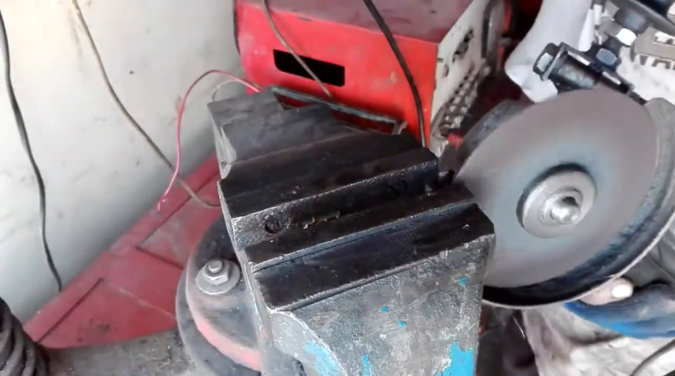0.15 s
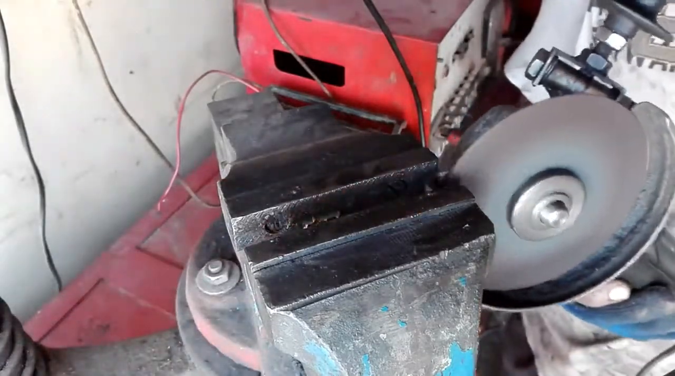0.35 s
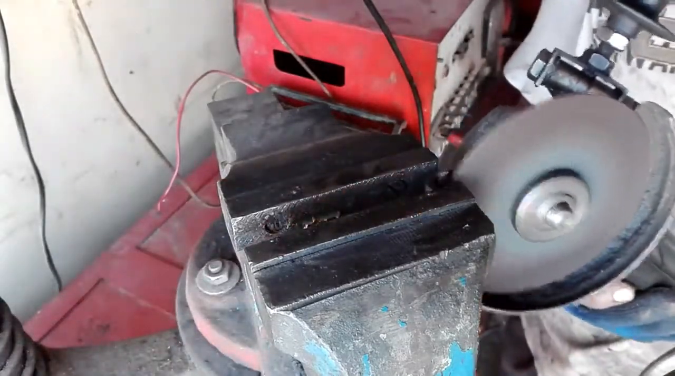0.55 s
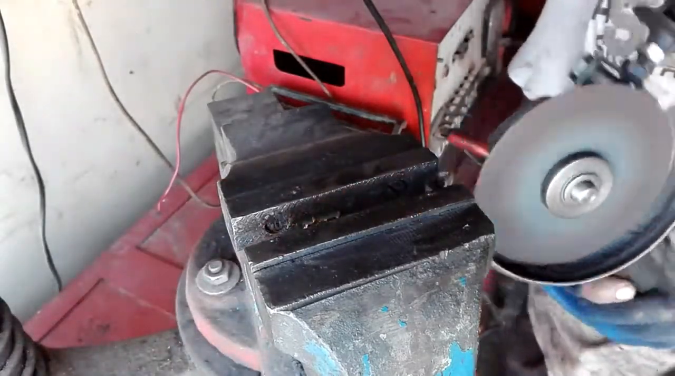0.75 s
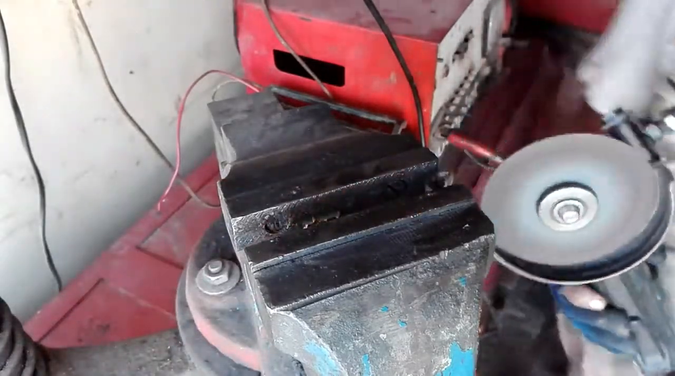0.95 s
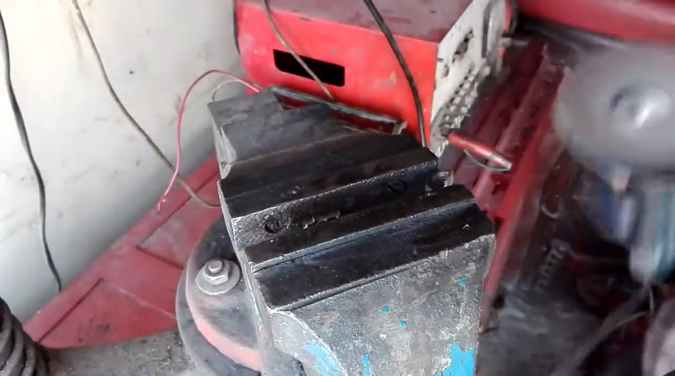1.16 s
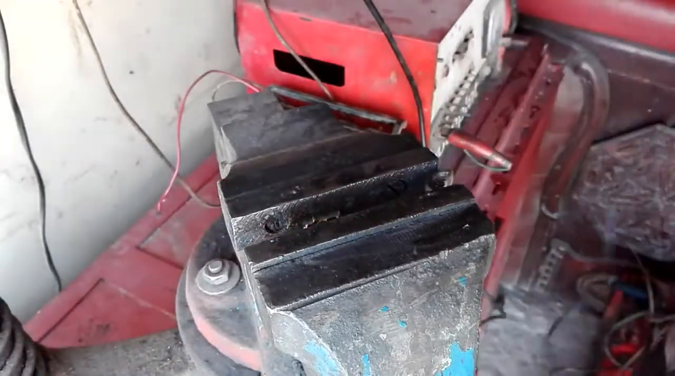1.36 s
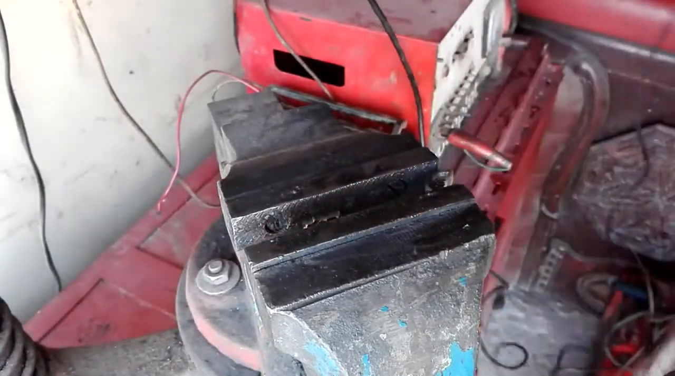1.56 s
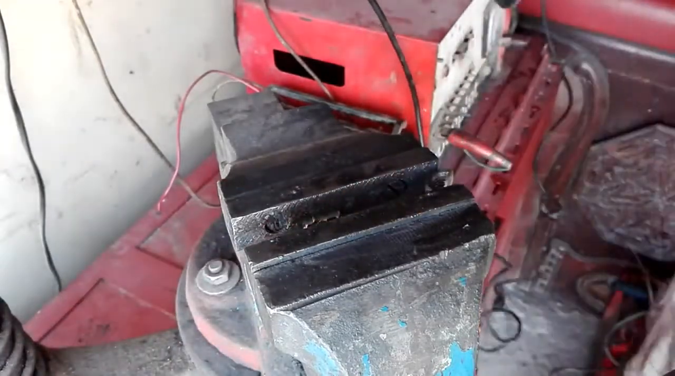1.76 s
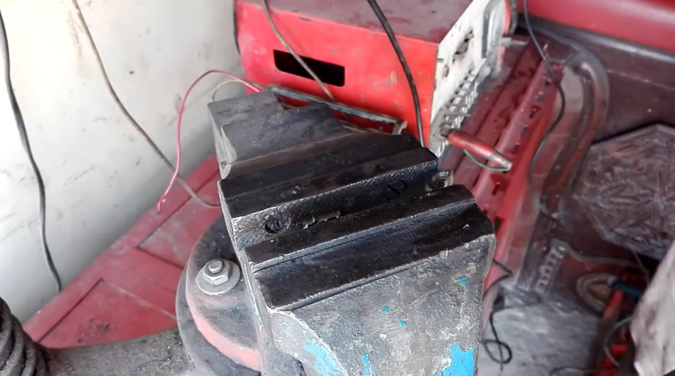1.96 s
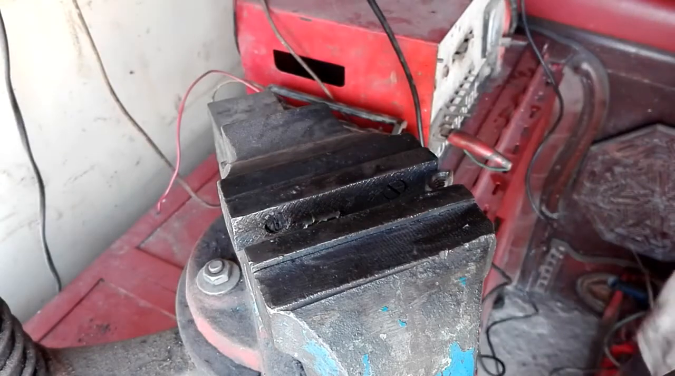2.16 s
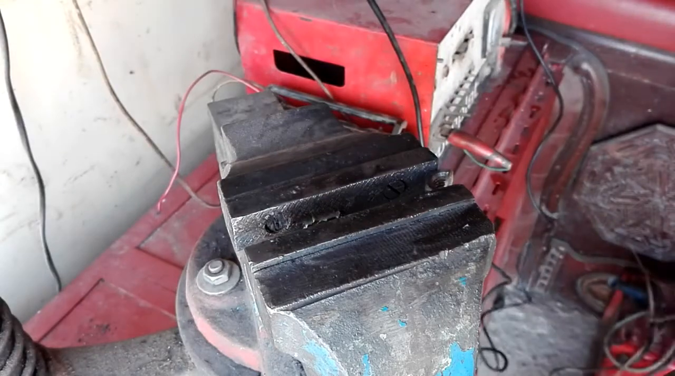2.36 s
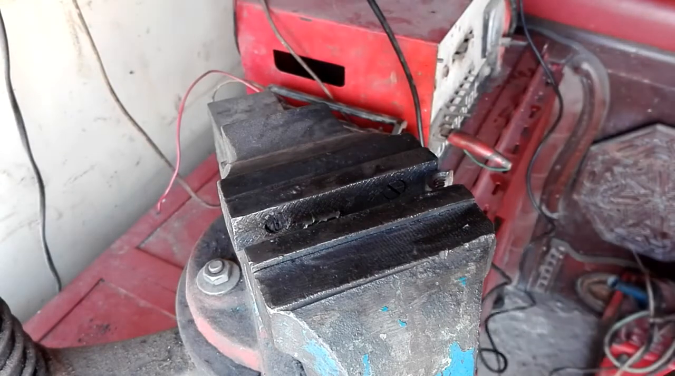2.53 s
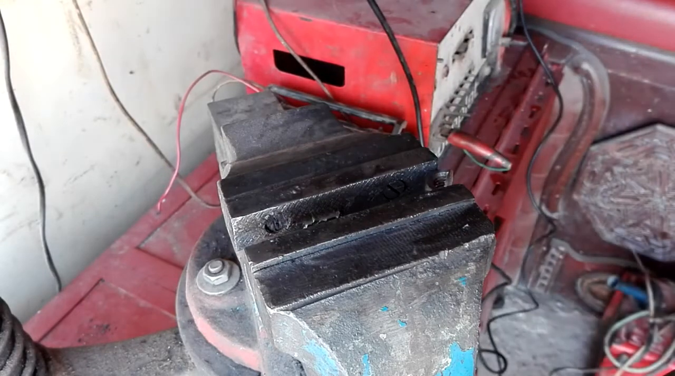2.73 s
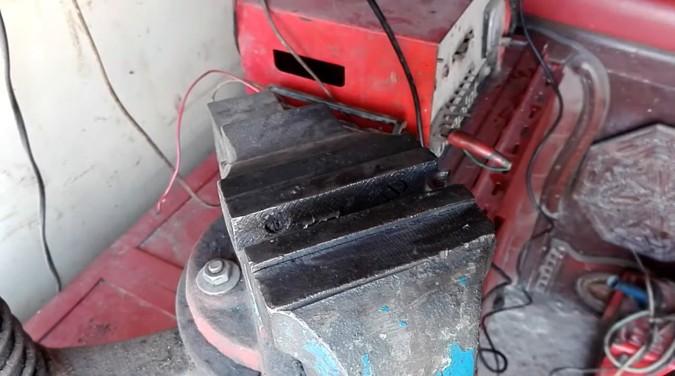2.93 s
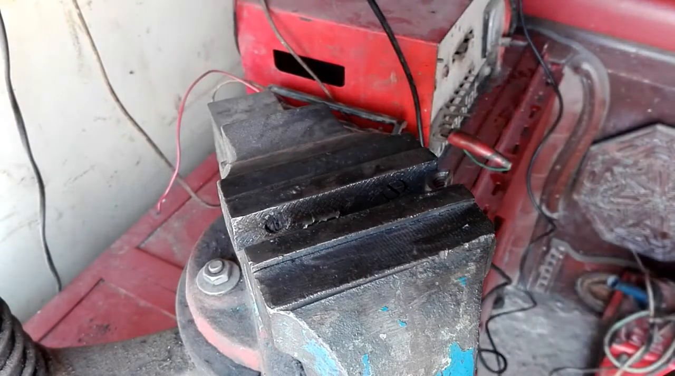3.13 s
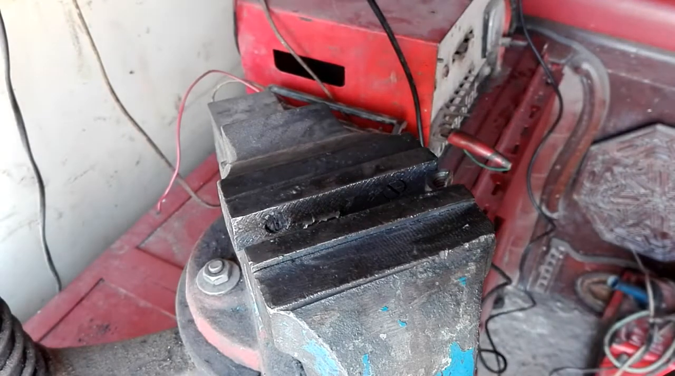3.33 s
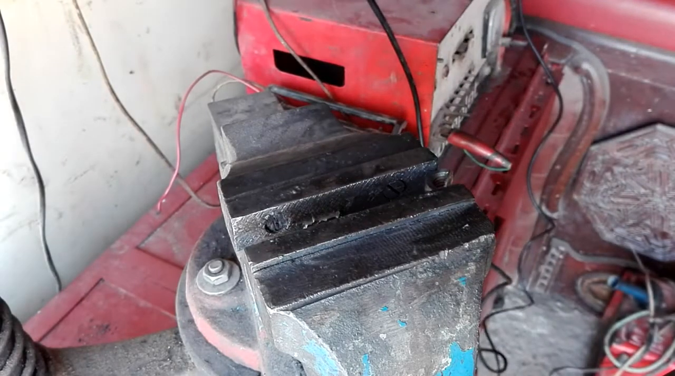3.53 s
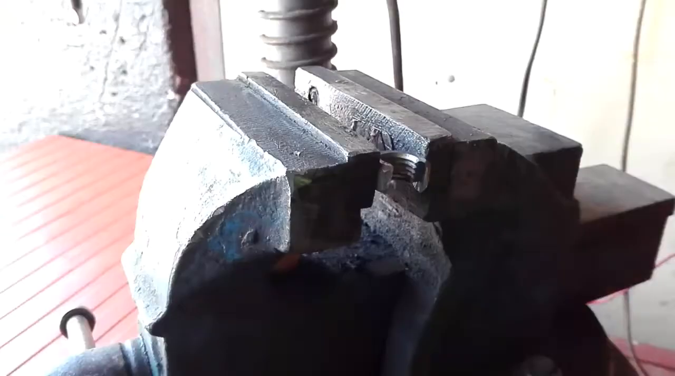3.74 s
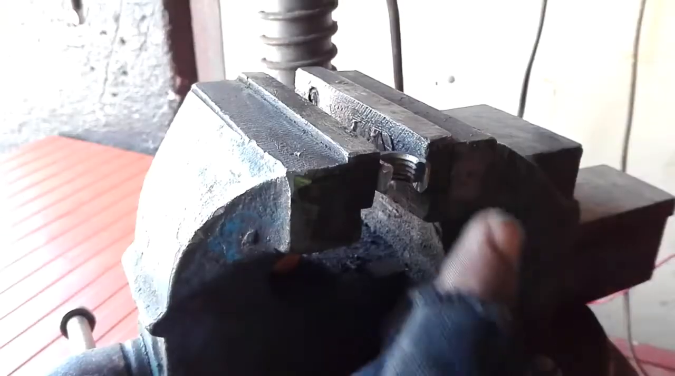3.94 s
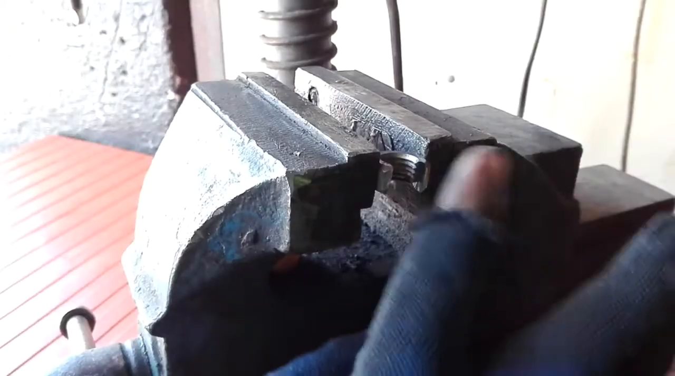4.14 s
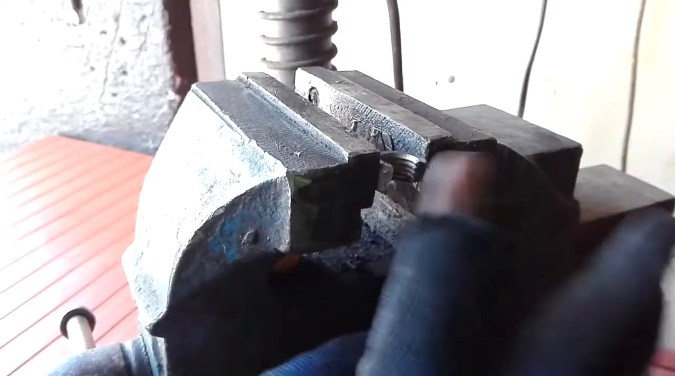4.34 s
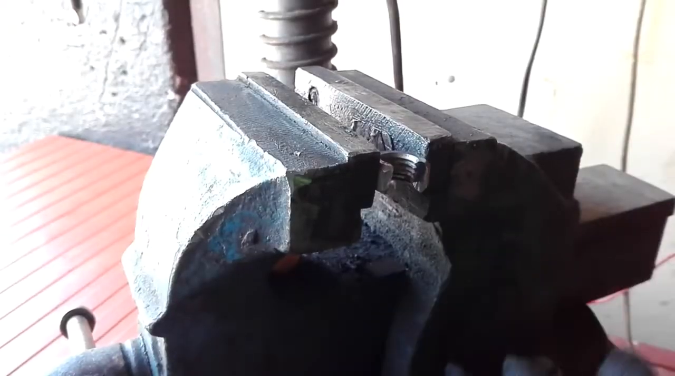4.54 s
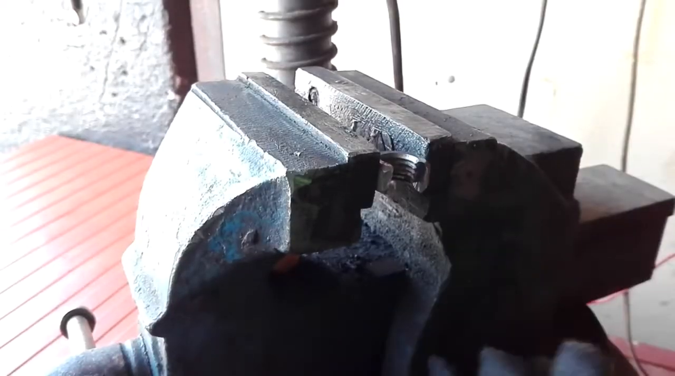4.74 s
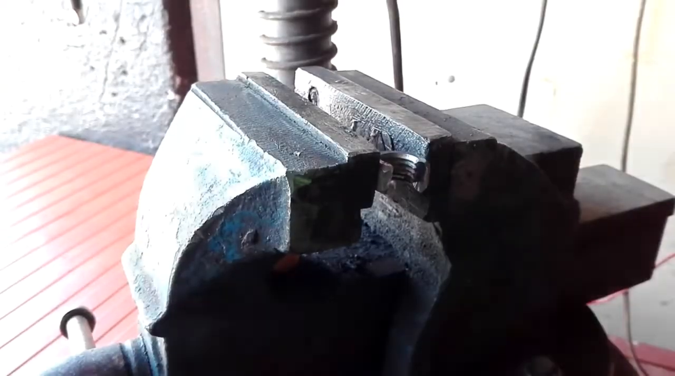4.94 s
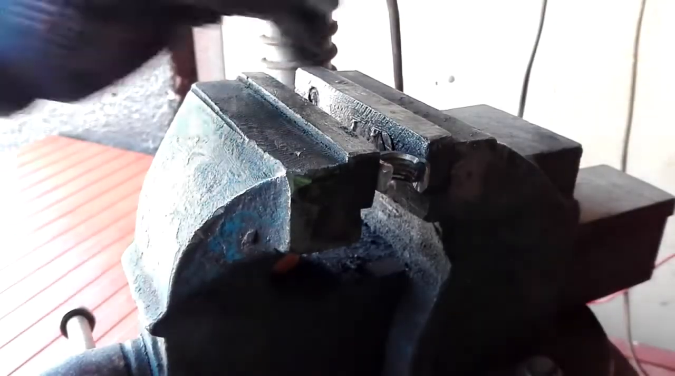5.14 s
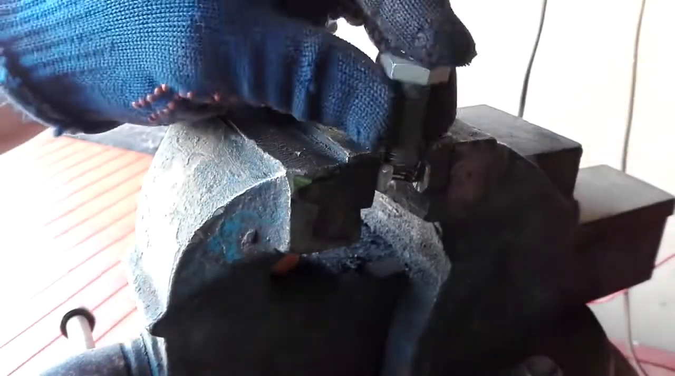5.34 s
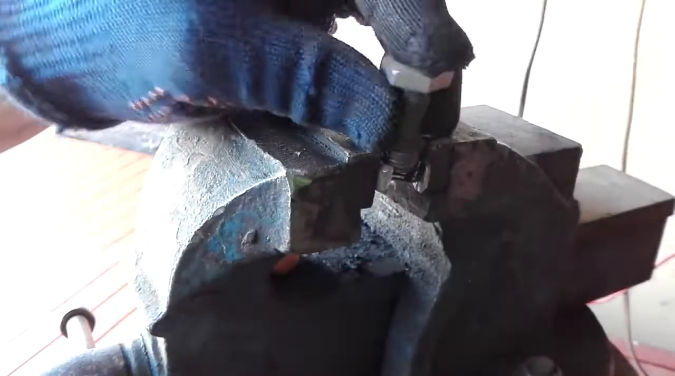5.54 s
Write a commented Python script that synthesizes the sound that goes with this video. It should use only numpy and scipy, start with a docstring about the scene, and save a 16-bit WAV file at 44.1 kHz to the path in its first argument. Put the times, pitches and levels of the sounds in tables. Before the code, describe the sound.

From 0 to about 0.8 s a cutting disc bites steel very close by: piercing, ringing screech with bright gritty hiss, first in two longer bursts, then in quick stuttering touches with small jolts from the vise, loud enough to overload. The disc skips free and the grinder coasts, a rushing, nasal whirr with irregular gear clatter, strongest from 0.8 to 2 s. A dull scraping thud marks it being put down near 2.1 s. The whirr darkens, its tooth whine slides downward, and knocks grow sparse and weak until about 3.8 s. There the sound abruptly drops almost to nothing, then fades back within a tenth of a second. Until about 5.6 s there is only a low engine drone from outside, gliding slightly upward, quiet airy workshop background, and tiny rustles of gloves and parts, with a soft rubbing from 5 s and a clearer rustle around 5.4 s before a minute dropout.

```python
"""An angle grinder finishes a cut in steel held in a vise, skips off the work, coasts down rattling and is laid aside.
Hiss-driven resonances make the screech; shaped noise, gear-tooth pulses and ringing case modes make the run-down.
A gliding firing tone drones outside the workshop. After a brief near-silence only the drone, shop air and small
handling sounds remain, the last two made of filtered noise."""
import sys
import numpy as np
from scipy import signal
from scipy.io import wavfile
from scipy.ndimage import uniform_filter1d

SR = 44100
rng = np.random.default_rng(int(sys.argv[2]) if len(sys.argv) > 2 else 0)


def to_linear_factor(level_db):
    """Convert decibel levels (scalar or array-like) to linear amplitude factors."""
    exponent = np.asarray(level_db, float) / 20
    return 10 ** exponent


def bounce(signal):
    """Save signal as a 16-bit WAV file at the path given by the first command-line argument."""
    frames = np.transpose(np.atleast_2d(signal))
    limited = np.clip(frames, -1, 1)
    pcm = np.round(limited * 32767).astype(np.int16)
    wavfile.write(sys.argv[1], SR, pcm)


N = 246511
T = np.arange(N) / SR  # time [s]

# disc biting the steel: (start [s], level [dB], length [s], jolt of the vise [dB])
TOUCHES = [(0.0, -9.5, 0.1, -32), (0.067, -7, 0.14, -24.5), (0.262, -6.5, 0.023, -15.5),
           (0.296, -8, 0.027, -17.5), (0.338, -15, 0.02, -26.5), (0.387, -7.5, 0.02, -25.5),
           (0.461, -11.5, 0.006, -36), (0.48, -9.5, 0.032, -23), (0.572, -9, 0.021, -27.5),
           (0.674, -8.5, 0.024, -19.5), (0.706, -15, 0.014, -34.5), (0.733, -5.5, 0.0074, -34),
           (0.773, -13, 0.0067, -36)]
# what disc and work ring with while cutting: (frequency [Hz], width [Hz], relative level [dB per Hz])
SCREECH = [(3000, 28, 6), (3750, 39, -9), (4236, 40, 1.5), (5470, 70, -1.5), (7430, 190, -0.5),
           (7910, 81, -21), (9520, 210, -6.5), (9300, 37, -11), (9840, 31, 0), (10430, 97, -4),
           (11260, 130, -4), (13600, 76, -13), (13660, 99, -7.5), (14400, 130, -9)]
# broad abrasive hiss of the cut: (frequency [Hz], relative level [dB per Hz])
ABRASIVE = [(150, -19.5), (250, -10.5), (1390, -13.5), (2370, -3.5), (2580, -6.5), (3020, -3), (4820, -3.5),
            (9460, -3.5), (12500, -7.5), (13800, 4.5), (15600, -14)]
SCREECH_DB = -1.5  # ringing relative to the abrasive hiss
JOLT_HZ, JOLT_WIDTH_HZ, PUSH = 200, 1700, .9

# running tool before load and fits: (time [s], level [dB], hiss above 9.5 kHz relative to its body [dB])
SPIN = [(0, -10.5, -9.5), (.45, -13, -13.5), (.8, -15.5, -12), (1.29, -20.5, -13), (1.44, -23.5, -14.5),
        (1.95, -25, -11), (2.25, -25.5, -11), (3.28, -30.5, -16.5), (3.55, -37, -17), (3.73, -42, -22),
        (3.82, -51.5, -22.5), (3.83, -93, -14.5)]
# blend of the three noise colours: (time [s], position [0 first spectrum, 1 second, 2 third])
COLOUR_BLEND = [(0, 1), (1.25, 0), (1.45, 1.25), (1.95, 1.34), (2.2, 2.5), (3.83, 2)]
# motor, fan and gear noise in three colours: (frequency [Hz], relative level [dB per Hz])
FIRST_COLOUR = [(290, -34.5), (500, -17.5), (781, -28.5), (1200, -20.5), (1560, -10.5), (3160, -4.5),
                (3600, -4.5), (3920, -1.5), (5380, -13), (7710, -9), (8530, -13), (13900, -17.5),
                (15600, -16.5)]
SECOND_COLOUR = [(290, -42.5), (500, -15.5), (686, -21), (864, -27.5), (1560, -21), (2810, -11.5),
                 (3250, -8.5), (3860, -1.5), (6400, -14), (7600, -3.5), (10000, -20), (13900, -17.5),
                 (15600, -22.5)]
THIRD_COLOUR = [(350, -42), (600, -32), (891, -18), (1120, -23), (1380, -1.5), (1620, -9), (1940, 2.5),
                (2760, -10.5), (3260, 6.5), (3630, -7.5), (5250, -6.5), (6260, -20), (7790, -8),
                (14600, -20), (15600, -23)]
# modes of gear case and guard: (frequency [Hz], width [Hz], relative level [dB])
GEAR_CASE = [(3320, 110, 7), (3192, 59, -0.5), (3087, 43, -3.5), (3868, 180, 6.5), (4050, 60, -1.5),
             (4370, 220, 3), (5103, 180, 2), (5293, 120, -7), (6080, 120, -3), (7556, 88, 0),
             (7810, 250, 6.5), (8570, 230, 0), (8980, 320, 1), (1994, 78, -15), (1580, 99, -15)]
# bands through which the tooth whine escapes the case: (frequency [Hz], width [Hz], level [dB])
WHINE_BANDS = [(6450, 700, -13), (10500, 900, -20), (5000, 600, -17)]
# fits of rattling as the slack gears shake:
# (middle [s], half length [s], swell [dB], extra treble chatter [dB])
FITS = [(1.077, 0.032, 1, 0), (1.317, 0.15, 1, 13), (1.528, .03, 0.5, 7.5), (1.632, .05, -1, 2.5),
        (1.762, 0.022, 5, 1.5), (1.892, 0.076, 5, 8), (2.21, 0.028, 1.5, 4.5), (2.433, 0.033, 3, 5)]
LOAD_DB, LOAD_HISS_DB = -4.5, 11.5  # while the disc bites, the gears quieten and the hiss brightens
# gear teeth meeting as the tool coasts: starting rate, fall per second, easing of that fall
MESH_HZ, SAG_HZ_PER_S, EASE_HZ_PER_S2 = 7520, 2337, 99.4
TEETH = 40  # teeth met per turn of the crown wheel
THROB_DB, RING_DB = 7, -6
CHATTER_DB, CHATTER_PER_S = -10.5, 570
SLOW_CHATTER_DB = 2  # gained as the tool slows to rest
SILENCE_S = 3.84  # the tool is heard no more

# loud knocks of the gear backlash:
# (time [s], blow to low modes [dB], to middle modes [dB], to top modes [dB])
KNOCKS = [(0.8319, -19, -11.5, -12), (0.8869, -17, -19.5, -11), (0.9492, -19, -25.5, -11.5),
          (1.0685, -22, -25, -10), (1.0795, -15, -20.5, -12.5), (1.1294, -20, -18, -19),
          (1.1827, -16.5, -12.5, -14.5), (1.2554, -19, -17, -18.5), (1.2916, -19.5, -16.5, -12.5),
          (1.3092, -28.5, -18.5, -17.5), (1.337, -37.5, -16.5, -13.5), (1.373, -22.5, -9, -10),
          (1.4142, -26.5, -19.5, -10), (1.4684, -27.5, -18, -23.5), (1.5252, -19.5, -11.5, -12.5),
          (1.5398, -25, -10, -14.5), (1.6146, -20, -18, -17), (1.6347, -23, -18, -25),
          (1.7453, -18.5, -15, -14), (1.7545, -15, -19, -20.5), (1.7653, -22, -25.5, -25.5),
          (1.883, -22, -17, -8), (1.8921, -19, -17.5, -12.5), (1.9062, -29.5, -21, -13),
          (1.9172, -27, -16, -19), (1.9314, -21, -28, -17.5), (2.0724, -24, -23, -22),
          (2.1956, -22, -16, -18.5), (2.2074, -26, -13.5, -17), (2.3002, -24, -24.5, -22),
          (2.3272, -21.5, -22.5, -22.5), (2.4357, -24.5, -28, -20), (2.507, -31.5, -27.5, -26.5),
          (2.7272, -26.5, -32.5, -23), (2.77, -23.5, -29, -26), (2.796, -31, -30, -29),
          (2.861, -29, -27.5, -30), (3.0669, -36, -36, -30), (3.246, -34, -40, -40),
          (3.532, -34.5, -45, -45)]
# lesser knocks relative to the tool's level: (low modes [dB], middle modes [dB], top modes [dB])
TAP_DB = (-5, -4.5, 0.5)
TAPS_FROM_S, TAPS_PER_S, TAP_SPREAD_DB = .9, 16, 2.5
TAP_DULLING_DB = -11  # added to middle and top modes per step of the colour blend beyond the second

# modes of the bench: (frequency [Hz], relative level [dB], approximate 60 dB ring time [s])
BENCH = [(540, 0, .025), (1400, 3, .012), (2000, 3, .012), (850, -4, .012), (420, -7, .03)]
THUD_S, THUD_DB = 2.086, -23.5  # level as rms over 20 ms

# engine firing tone, one list before and one after the near-silence: (time [s], pitch [Hz], rms level [dB])
FIRING = [
    [(0, 78.8, -44), (.92, 80.93, -41.5), (1.62, 84.38, -40), (3.29, 91, -31.5), (3.83, 91.8, -29)],
    [(3.86, 77.9, -32), (4.0, 77.2, -33.5), (4.09, 79.84, -37.5), (4.3, 80.1, -32.5), (4.62, 81.1, -36.5),
     (4.9, 83.7, -37), (5.59, 86.2, -36)],
]
# fainter engine lines gliding with the firing tone:
# (multiple of its pitch [ratio], start [s], end [s], rms level [dB], fuzz [Hz])
ENGINE_ORDERS = [(2.17, .7, 2.4, -48, 5), (2.7, .6, 2.6, -43, 3), (3.24, .8, 3.3, -49, 6),
                 (4.37, .8, 2.9, -47.5, 5), (4.89, .8, 2.2, -51, 5), (.7, 4.3, 5.7, -43, 6),
                 (1.5, 4.4, 5.3, -47, 8), (1.99, 3.9, 5.3, -46, 3), (3.29, 3.9, 4.9, -47, 4),
                 (2.78, 4.6, 5.6, -51, 8), (5.03, 4.62, 5.35, -52, 9), (6.75, 3.9, 4.7, -63, 7)]
# fuzzy hums at a steady pitch: (pitch [Hz], start [s], end [s], rms level [dB], fuzz [Hz])
HUMS = [(1075, 0.21, 1.05, -38, 45), (388.7, 1.7, 3.7, -42, 160), (421, 2.0, 3.81, -42, 35),
        (543, 2.0, 3.7, -42.5, 23), (889, 2.5, 3.47, -48.5, 42), (2850, 3.82, 4.6, -59, 90)]

# spectrum of shop air and traffic: (frequency [Hz], relative level [dB per Hz])
SHOP = [(12, -44), (20, -10), (90, -7), (202, -12), (282, -11.5), (353, -25.5), (417, -19), (770, -31.5),
        (1500, -25), (1730, -30), (2350, -29), (5420, -41), (13200, -52), (15600, -55.5)]
# its course: (time [s], level [dB], brightness above 1.5 kHz [dB per octave])
SHOP_LEVEL = [(0, -32.5, 8), (1.5, -38.5, 6.5), (3, -37, 9.5), (3.83, -35.5, -1.5), (4.0, -41, 3.5),
              (4.2, -37, .5), (5.05, -39, 0.5), (5.6, -38, 2)]
# gloves and small parts handled near the microphone: (start [s], level [dB], centre [Hz], width [Hz])
RUSTLES = [(3.92, -56, 10680, 4955), (4.039, -57.5, 5095, 5020), (4.113, -52, 6030, 3007),
           (4.145, -52.5, 9000, 8040), (4.191, -59, 12060, 2960), (4.361, -61, 12300, 6094),
           (4.5, -54, 9940, 9130), (5.125, -56, 8260, 4000), (5.178, -52, 7550, 2010),
           (5.224, -57, 7550, 1996), (5.32, -56.5, 5520, 4020), (5.429, -46, 4000, 3500),
           (5.505, -57, 9320, 5940)]
RUSTLE_S = .017  # hold of each rustle
# longer noises, a faint high hiss and a lower rubbing:
# (start [s], level [dB], centre [Hz], width [Hz], length [s])
LONG_NOISES = [(3.906, -63, 13500, 5000, .75), (4.98, -53.5, 2287, 498, 0.43)]

# the sound drops out and comes back: (start [s], time held down [s], fade-in slope [s])
DROPOUTS = [(3.825, .025, .11), (5.4505, .014, .002)]
LEFT_GAIN = .008  # gain left in a drop-out
CLIP = 0.93  # ceiling of the overload, full scale is 1
MIC_LOW_HZ, MIC_HIGH_HZ = 38, 15750


def evened(x):
    """Scales a sound to rms 1."""
    return x / np.sqrt(np.mean(x ** 2) + 1e-20)


def read(points, hz):
    """Reads a spectrum drawn as points over log frequency."""
    f, value = np.transpose(points)
    return np.interp(np.log(hz + 1), np.log(f + 1), value)


def curve(rows, t=T):
    """Draws each column of a table as straight lines over time."""
    s, *columns = np.transpose(rows)
    return [np.interp(t, s, c) for c in columns]


def noise(field_db, size, patchy_db):
    """Noise from random short-time spectra; field_db(t, hz) shapes it, smooth random patches mottle it."""
    t = np.arange(N * 4 // size + 5) * size / 4 / SR
    hz = np.fft.rfftfreq(size, 1 / SR)[:, None]
    real, imag, patches = rng.standard_normal((len(t), len(hz), 3)).T
    patches = uniform_filter1d(patches, size=9, axis=0)
    patches = evened(uniform_filter1d(patches, size=7, axis=1))
    spectra = (real + 1j * imag) * to_linear_factor(field_db(t, hz) + patchy_db * patches)
    return signal.istft(spectra, nperseg=size, noverlap=size * 3 // 4)[1][:N]


def resonate(x, hz, width):
    """Shifts hz down to zero, smooths, and shifts back: a resonance of gain 1."""
    turn = np.exp(2j * np.pi * np.cumsum(hz * np.ones(len(x))) / SR)
    r = np.exp(-np.pi * width / SR)
    return 2 * (turn * signal.lfilter([1 - r], [1, -r], x / turn)).real


def stroke(start, length, fall_s):
    """Envelope with a 3 ms rise, steady hold and exponential fall."""
    rise = np.clip((T - start) / .003, 0, 1)
    return rise * np.exp(-np.maximum(T - start - length, 0) / fall_s)


def contact():
    """How hard the disc bites the work: the strongest touch at each moment."""
    return np.max([to_linear_factor(db) * stroke(s, length, 0.0035) for s, db, length, _ in TOUCHES], axis=0)


def cutting():
    """Abrasive hiss rings disc and work while they touch; each catch of the disc jolts the vise."""
    hiss = evened(noise(lambda t, hz: read(ABRASIVE, hz) + 0 * t, size=512, patchy_db=2.0))
    grit = rng.standard_normal(N)
    ring = evened(sum(to_linear_factor(db) * evened(resonate(grit, hz, width)) * np.sqrt(width)
                      for hz, width, db in SCREECH))
    # each catch comes a third of the way into its touch
    catch = sum(to_linear_factor(db) * stroke(s + .33 * length, .12 * length, .003) for s, _, length, db in TOUCHES)
    rattle = evened(resonate(rng.standard_normal(N), JOLT_HZ, JOLT_WIDTH_HZ))
    jolt = (rattle - PUSH) * catch  # a rattle on top of one push
    return contact() * evened(hiss + to_linear_factor(SCREECH_DB) * ring) + jolt


def spin():
    """Level, hiss and treble chatter of the tool in dB: the slow run-down, the load of cutting, the fits."""
    level_db, hiss_db = curve(SPIN)
    load = uniform_filter1d(contact() / contact().max(), size=600)
    bumps = np.array([np.clip(1 - abs(T - s) / half, 0, 1) for s, half, _, _ in FITS])
    swell_db, shrill_db = np.transpose(FITS)[2:] @ bumps
    return level_db + LOAD_DB * load + swell_db, hiss_db + LOAD_HISS_DB * load, shrill_db


def gear_case(low, mid, high):
    """Blows ring the case; its low, middle and top modes each take their own blow sizes."""
    out = 0
    for hz, width, db in GEAR_CASE:
        blows = low if hz < 7000 else mid if hz < 8200 else high
        mode = resonate(resonate(blows, hz, width), hz, 5 * width)  # the second pass rounds the attack
        out = out + to_linear_factor(db) * mode * SR / (2 * np.pi * width)
    return out


def whirr():
    """Motor and fan noise, tooth whine and chatter of unloaded gears; teeth and throb slow with the tool."""
    level_db, hiss_db, shrill_db = spin()

    def field_db(t, hz):
        """Crossfades the three noise colours, then sets the treble to the hiss level."""
        position, treble_db = curve(COLOUR_BLEND, t)[0], np.interp(t, T, hiss_db)
        body_hz = np.linspace(2500, 5500, 60)
        colours = (FIRST_COLOUR, SECOND_COLOUR, THIRD_COLOUR)
        shapes = [read(s, hz) - read(s, body_hz).mean() for s in colours]
        blend = sum(np.clip(1 - abs(position - k), 0, 1) * shape for k, shape in enumerate(shapes))
        top = blend[hz[:, 0] > 9500].mean(0)
        return blend + np.clip((hz - 7500) / 2500, 0, 1) * (treble_db - top)

    rush = noise(field_db, size=512, patchy_db=2.0)
    rush = rush / np.std(resonate(rush, 4000, 2500))
    shake = rng.standard_normal(N)  # the motor's shake keeps the case ringing
    shrill_shake = shake * to_linear_factor(shrill_db)
    rush = rush + to_linear_factor(RING_DB) * evened(gear_case(shake, 0.53 * shrill_shake, 0.38 * shrill_shake))

    coasting_hz = np.maximum(MESH_HZ - SAG_HZ_PER_S * T + EASE_HZ_PER_S2 * T ** 2, 40)
    mesh_hz = np.where(T < SILENCE_S, coasting_hz, 40)
    teeth = np.cumsum(mesh_hz) / SR
    throb = to_linear_factor(THROB_DB * np.cos(2 * np.pi * teeth / TEETH))  # the uneven crown wheel bites once a turn

    sign = rng.choice([-1., 1.], N) * (rng.random(N) < CHATTER_PER_S / SR)
    low, mid, high = throb * sign * to_linear_factor(6.3 * np.minimum(rng.exponential(1, (3, N)), 4))
    # the chatter has less treble toward the third colour
    loose = np.clip(1.2 - 0.44 * curve(COLOUR_BLEND)[0], 0, 2) * to_linear_factor(shrill_db)
    chatter = evened(gear_case(low, loose * mid, .6 * loose * high))
    chatter_db = CHATTER_DB + SLOW_CHATTER_DB * (1 - mesh_hz / MESH_HZ)

    comb = sum(np.cos(2 * np.pi * k * teeth) * (k * mesh_hz < 15000) for k in range(1, 9))
    whine = sum(to_linear_factor(db) * resonate(resonate(comb, hz, width), hz, width) for hz, width, db in WHINE_BANDS)
    whine = whine * np.clip((T - 1.7) / 0.19, 0, 1)  # the whine fades in during the run-down
    return to_linear_factor(level_db) * (throb ** 0.22 * rush + to_linear_factor(chatter_db) * chatter + whine)


def knocks():
    """Backlash rings the case: each knock, placed or random, is five tooth impacts within 9 ms."""
    gap, *size = rng.random((200, 4)).T
    when = TAPS_FROM_S + np.cumsum(-np.log(1 - gap) / TAPS_PER_S)
    taps_db = curve(SPIN, when)[0] + np.array(TAP_DB)[:, None] - TAP_SPREAD_DB * np.log(1 - np.array(size))
    taps_db[1:] += TAP_DULLING_DB * np.maximum(curve(COLOUR_BLEND, when)[0] - 1, 0)
    taps = np.vstack([when, taps_db]).T[when < SILENCE_S]
    rows = np.vstack([KNOCKS, taps])
    blows = np.zeros((3, N))
    draws = rng.random((300, 2, 5))
    fading = np.linspace(0, 1, 5)  # the first impact is the hardest, the later ones trail off
    for (s, *db), (delay, sign) in zip(rows, draws):
        at = np.round((s + .009 * delay * fading) * SR).astype(int)
        blows[:, at] += to_linear_factor(np.array(db)[:, None]) * np.sign(sign - .5) * (1 - 0.84 * fading)
    return gear_case(*blows)


def thud():
    """The tool meets the bench: a short noise blow rings the bench modes, dull and scraping."""
    blow = rng.standard_normal(N) * stroke(THUD_S, 0.012, .005)
    rings = sum(to_linear_factor(db) * resonate(blow, hz, 2.0 / t60) / np.sqrt(2.2 / t60) for hz, db, t60 in BENCH)
    return to_linear_factor(THUD_DB) * rings / np.sqrt(np.sum(rings ** 2) / (.02 * SR))


def line(hz, start, end, db, fuzz_hz):
    """One faint line that fades in and out, part tone and part narrow noise."""
    fuzz = evened(resonate(resonate(rng.standard_normal(N), hz, fuzz_hz), hz, 4 * fuzz_hz))
    tone = np.sqrt(2) * np.sin(2 * np.pi * (np.cumsum(hz * np.ones(N)) / SR + rng.random()))
    clean = np.clip(1.3 - fuzz_hz / 10, 0, .85)  # narrow lines hold steady, wide ones are all fuzz
    fade = np.clip(np.minimum(T - start, end - T) / 0.12, 0, 1)
    return to_linear_factor(db) * (np.sqrt(clean) * tone + np.sqrt(1 - clean) * fuzz) * fade


def engine_and_hums():
    """A clean firing tone that glides up and weaker lines that follow it, plus steady hums: the tool whining at
    the vise, bench tones while the tool lies on it, and a faint high hum after the near-silence."""
    hz, db = curve(FIRING[0] + FIRING[1])
    firing = np.sqrt(2) * to_linear_factor(db) * np.sin(2 * np.pi * np.cumsum(hz) / SR)
    orders = sum(line(k * hz, *rest) for k, *rest in ENGINE_ORDERS)
    return firing + orders + sum(line(*row) for row in HUMS)


def shop():
    """Workshop air as patchy shaped noise, with grainy band noise as short rustles and longer noises."""
    def field_db(t, hz):
        """Tilts the air's spectrum above 1.5 kHz by its brightness."""
        octaves = np.clip(np.log2(hz / 1500 + 1e-3), 0, 2.5)
        return read(SHOP, hz) + curve(SHOP_LEVEL, t)[1] * octaves

    out = to_linear_factor(curve(SHOP_LEVEL)[0]) * evened(noise(field_db, size=2048, patchy_db=2.5))
    # the grain jumps in level every 64 samples
    grain = rng.standard_normal(N) * to_linear_factor(1.8 * rng.exponential(1, N // 64 + 1).repeat(64)[:N])
    for s, db, hz, width, length in [(*row, RUSTLE_S) for row in RUSTLES] + LONG_NOISES:
        part = slice(round(s * SR), round((s + 2 * length + .05) * SR))
        band = resonate(resonate(grain[part], hz, width), hz, width)
        out[part] += to_linear_factor(db) * evened(band) * stroke(s, length, 0.0033 + 0.24 * length)[part]
    return out


def scene():
    """One microphone hears everything; both channels carry it."""
    mono = cutting() + whirr() + knocks() + thud() + engine_and_hums() + shop()
    return np.array([mono, mono])


def band_limit(x):
    """A steep low-pass at the top of the band."""
    return signal.sosfilt(signal.butter(12, 15770, fs=SR, output="sos"), x)


def record(dry):
    """Microphone band limits, soft overload near full scale and the drop-outs."""
    low_cut = signal.butter(2, MIC_LOW_HZ, "high", fs=SR, output="sos")
    dry = signal.sosfilt(low_cut, dry)
    loud = CLIP * np.tanh((abs(dry) / CLIP) ** 3) ** (1 / 3) * np.sign(dry)
    gain = np.prod([np.clip(np.maximum((s - T) / .0015, (T - s - quiet) / rise), LEFT_GAIN, 1)
                    for s, quiet, rise in DROPOUTS], axis=0)
    high_cut = signal.firwin(511, MIC_HIGH_HZ, window=("kaiser", 9), fs=SR)
    loud = signal.oaconvolve(loud, high_cut[None], "same")
    return band_limit(loud * gain)


dry = scene()
out = record(dry)
bounce(out)
```